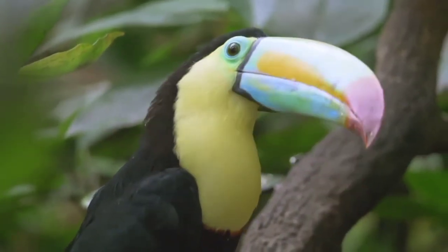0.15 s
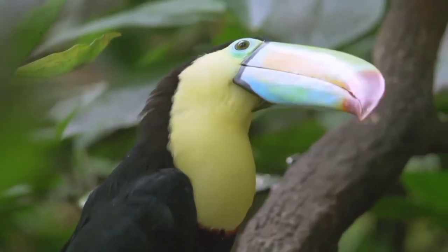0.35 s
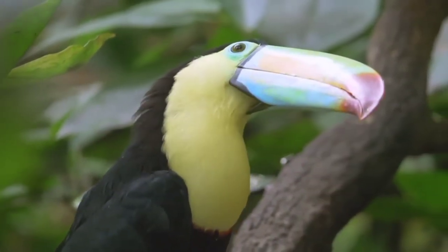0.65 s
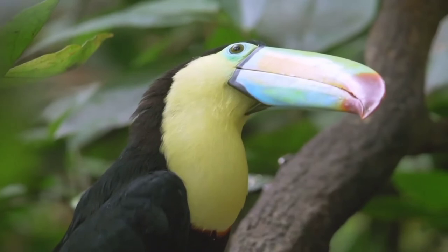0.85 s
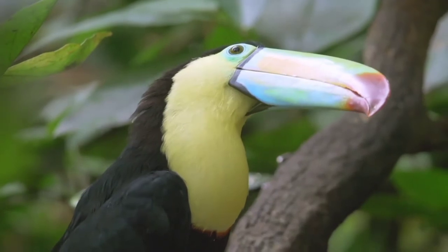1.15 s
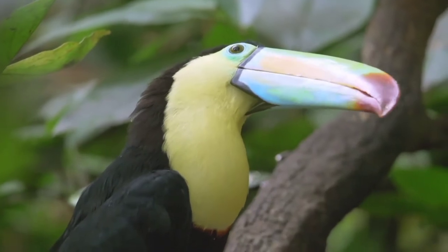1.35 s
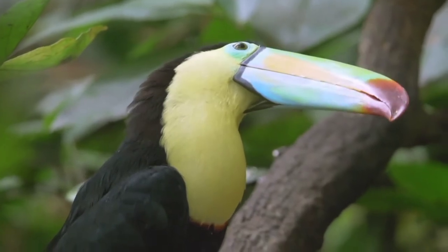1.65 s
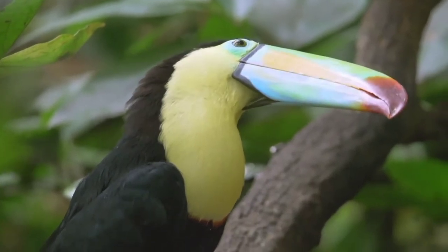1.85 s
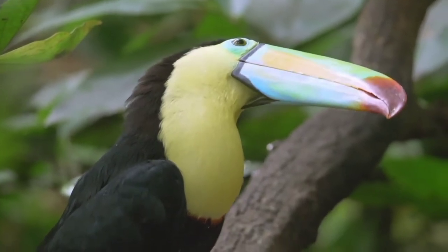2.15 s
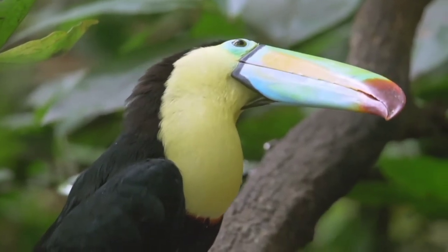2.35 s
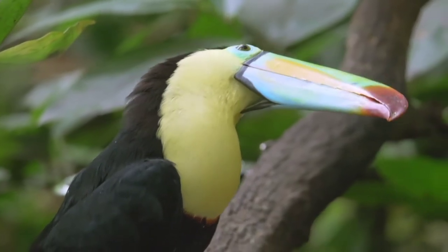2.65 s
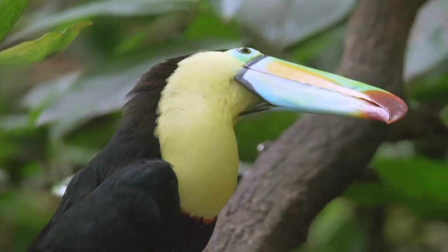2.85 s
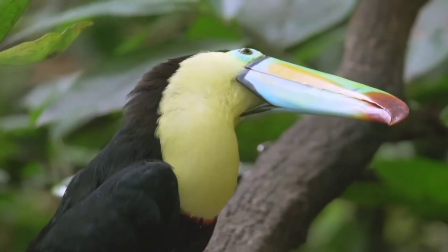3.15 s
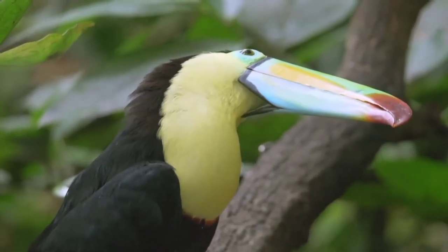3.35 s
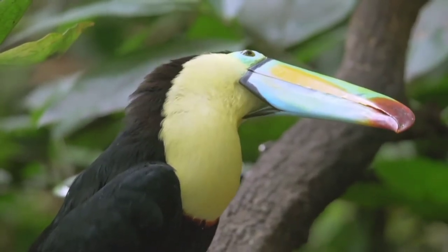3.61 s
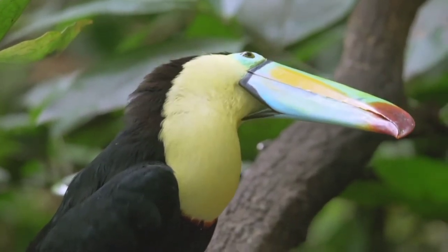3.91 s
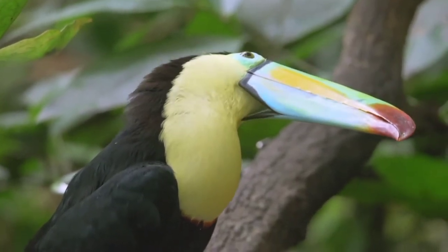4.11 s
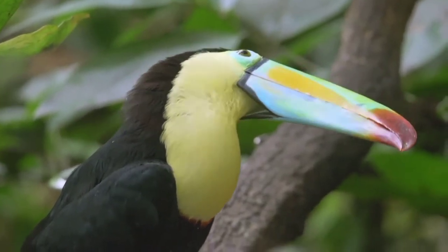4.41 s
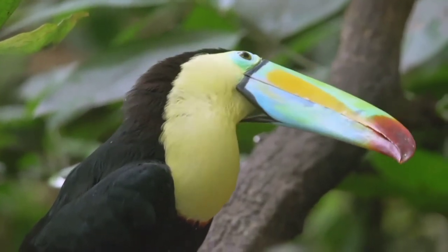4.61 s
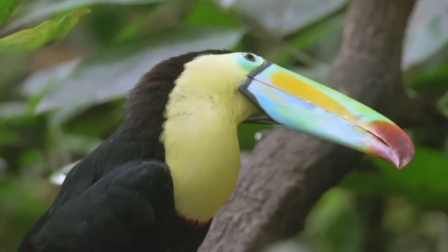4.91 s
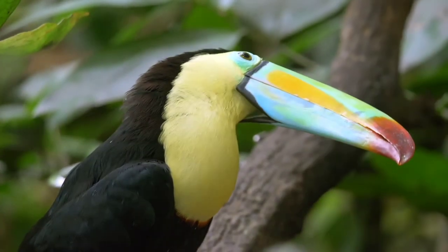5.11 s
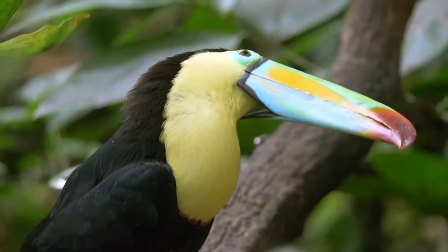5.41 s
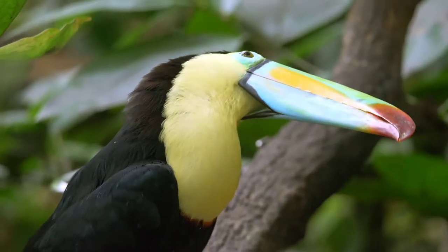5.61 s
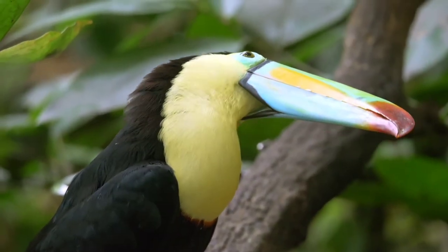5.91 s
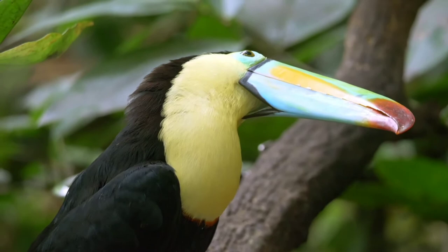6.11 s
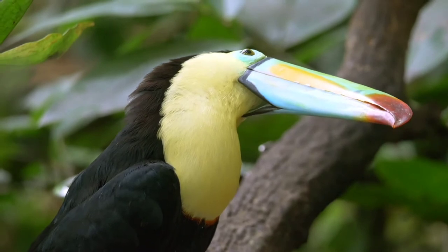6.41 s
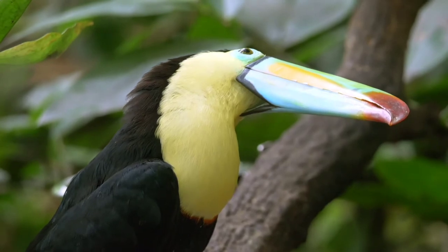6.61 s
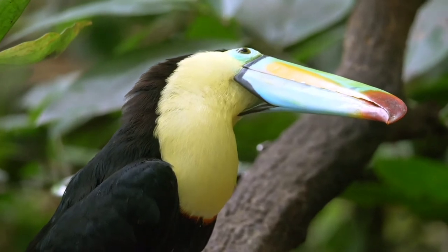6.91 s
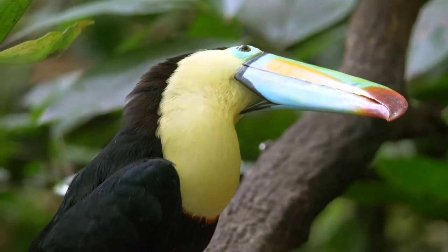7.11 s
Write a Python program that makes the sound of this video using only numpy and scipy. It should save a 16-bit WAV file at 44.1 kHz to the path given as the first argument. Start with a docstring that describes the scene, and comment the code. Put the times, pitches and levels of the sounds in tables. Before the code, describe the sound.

Brief hoarse toucan yelps, each drooping at the end, repeat close by over faint air and rumble, with distant whines and thin peeps behind.

```python
"""A toucan, close to the microphones in a reverberant aviary, yelps seven times, mostly in pairs.
Each yelp starts with a rasp, locks into a reedy tone, steps in pitch as the bird pushes, then droops.
Its harmonics share one gliding phase, roughened by noise; light bill clicks come before some yelps.
Further off another bird whines and a small one peeps, both as gliding tones with more of the room.
Low hollow swells of resonant noise come from the right, over faint air and a rumble."""
import sys
import numpy as np
from scipy import signal
from scipy.fft import rfft, irfft
from scipy.io import wavfile

SR = 44100
rng = np.random.default_rng(int(sys.argv[2]) if len(sys.argv) > 2 else 0)


def wrap_up_sound(samples):
    """Save the sound to the file named by the first command line argument, as 16-bit audio."""
    columns = np.atleast_2d(samples).T
    # keep every value between -1 and 1, then stretch to whole-number steps
    tamed = np.clip(columns, -1, 1)
    steps = np.round(tamed * 32767).astype(np.int16)
    wavfile.write(sys.argv[1], SR, steps)


N = 320166
TIME = np.arange(N) / SR


def undb(db):
    """Decibels to gain."""
    return 10 ** (np.asarray(db) / 20)


def unit(x):
    """Scale to rms 1."""
    return x / np.sqrt(np.mean(x ** 2))


def pan(x, left_db):
    """Place a sound between the two microphones by its left minus right level."""
    return x * undb(np.array([[left_db], [-left_db]]) / 2)


def noise(points):
    """Noise of rms 1 with a spectrum of (f/Hz, level/dB) points, joined along log frequency."""
    hz, db = np.transpose(points)
    bins = np.fft.rfftfreq(N, 1 / SR) + 1  # 1 Hz up, to keep the logarithm finite
    colour = undb(np.interp(np.log(bins), np.log(hz), db))
    return unit(irfft(rfft(rng.standard_normal(N)) * colour, N))


def band(centre_hz, width_hz):
    """Noise of rms 1 in one steep-sided resonance."""
    bins = np.fft.rfftfreq(N, 1 / SR)
    resonance = 1 / (1 + (2 * (bins - centre_hz) / width_hz) ** 4)
    return unit(irfft(rfft(rng.standard_normal(N)) * resonance, N))


def wander(rate_hz):
    """Smooth random movement of rms 1, mostly slower than rate_hz."""
    return band(0, 2 * rate_hz)


def gate(t, start, end, rise, fall):
    """Open from start to end, with smooth ramps outside."""
    ramp = np.clip(np.minimum((t - start) / rise, (end - t) / fall) + 1, 0, 1)
    return np.sin(ramp * np.pi / 2) ** 2


# colour of the steady air in the aviary: f/Hz, relative density/dB per Hz
AIR_COLOUR = [(30, 5.5), (80, -1), (130, -6), (165, -3), (210, -8), (330, -11.5), (460, -16), (750, -14.5),
              (1200, -21), (2200, -26.5), (4500, -32), (9000, -32.5), (11000, -47)]
# course of the low rumble before its own gain: t/s, level/dB
RUMBLE_COURSE = [(0.0, -81), (0.2, -82), (0.32, -59.5), (3.01, -60.5), (3.66, -62.5), (3.8, -75.5),
                 (4.63, -65.5), (7.26, -68)]


def background():
    """Broadband air and a slowly heaving low rumble, partly unrelated at the two microphones."""
    air = noise(AIR_COLOUR) + .7 * np.array([noise(AIR_COLOUR), noise(AIR_COLOUR)])
    low = 0.23 * band(30, 90) + np.array([band(25, 100), band(21, 120)])
    rumble = low * undb(np.interp(TIME, *np.transpose(RUMBLE_COURSE)) + 0.5)
    return pan(air * undb(-68.5), -2) + pan(rumble, -2.5)


# the nearer whine, already rising at the opening:
# end t/s, opening f/Hz, rise/Hz per s, level before the mix/dB, slope/dB per harmonic
OPENING_WHINE = (0.2757, 1901, 2397.5, -39, -3.5)
WHINE_CURL_HZ_PER_S2 = 2100  # it climbs ever faster
WHINE_DULL_DB_PER_S = 9.5  # extra fading, once for each step up the harmonics


def near_whine():
    """One hoarse, rising whine: five harmonics on an unsteady pitch, with a band of noise."""
    end, pitch_hz, rise_hz_per_s, db, slope_db = OPENING_WHINE
    t = np.minimum(TIME, end)
    glide_hz = pitch_hz + rise_hz_per_s * t + WHINE_CURL_HZ_PER_S2 * t ** 2
    hz = glide_hz * (1 + 0.0093 * wander(300) + .004 * wander(22))
    phase = 2 * np.pi * np.cumsum(hz) / SR
    tilt_db = slope_db - WHINE_DULL_DB_PER_S * t
    harmonics = sum(undb(k * tilt_db) * np.sin((k + 1) * phase) for k in range(5))
    hoarseness = undb(-23) * band(3100, 700)
    level = np.sqrt(2) * undb(db) * gate(TIME, 0, end, .01, .03)
    return pan(level * (harmonics + hoarseness), 11)


# toucan yelps; pitch steps down in the first of a pair and up in the second. Levels precede envelope and mix:
# start t/s, length t/s, push after t/s, pitch f/Hz, step f/Hz,
# harmonics 1, 2, 3 before the push level/dB, harmonics 1, 2, 3 after it level/dB,
# rasp lead t/s, rasp level/dB, period doubling level/dB, overtones level/dB, hoarseness level/dB
TOUCAN_YELPS = [(0.172, 0.14, 0.041, 1788, -101, -29, -26, -40.5, -16, -14, -21, .043, -35.5, -26, 1, -41.5),
                (0.738, 0.14, 0.062, 1622, 113.5, -29.5, -21, -21, -18, -12.5, -15, 0.017, -31.5, -38, 10, -41),
                (2.436, 0.18, 0.059, 1799, -105, -24, -16.5, -31.5, -18.5, -20.5, -35, 0.026, -28, -49.5, -8.5, -43.5),
                (3.043, 0.16, 0.077, 1596, 86.5, -30, -25, -39.5, -22, -18, -32, 0.0064, -42.5, -41, -5, -38.5),
                (5.032, 0.16, 0.034, 1791, -92.5, -28, -24, -46, -17.5, -18.5, -32.5, 0.043, -37.5, -57, -14, -43),
                (5.518, .14, 0.09, 1608, 121.5, -31, -26, -36.5, -21, -15.5, -30.5, 0.013, -40, -44.5, -5.5, -39),
                (7.182, 0.23, 0.069, 1800, -94, -32.5, -26.5, -35.5, 2, -5, -26, 0.039, -40.5, -52, -5.5, -32)]
# weak upper harmonics: multiple of the pitch, level against the whole tone before each yelp's setting/dB
UPPER_HARMONICS = [(4, -30), (5, -29.5), (6, -54)]
# colour of the air noise in throat and bill: f/Hz, relative level/dB
THROAT_COLOUR = [(400, -46.5), (700, -13), (1100, -3.5), (1600, -2), (2000, -8), (2350, -1.5), (3200, -2.5),
                 (3800, -6.5), (4700, -3.5), (5500, -16), (6200, -13), (7200, -19.5), (8100, -23),
                 (10500, -44)]
# harmonics thrown forward by the bill, alike in every yelp: multiple of the pitch, level before envelope/dB
BILL_BEAM = [(1, -32.5), (2, -26), (3, -25), (4, -45), (5, -49), (6, -62.5)]
SAG_HZ_PER_S, FADE_DB_PER_S = 640, 13  # steady fall of pitch; fall of level after the push
PUSH_S = .0083  # time scale of the push
DROOP_HZ, DROOP_S = 132, .017  # fall of pitch as the pressure gives out
RELEASE_DB, RELEASE_S = 10.5, 0.015  # fall of level with it
CLOSE_S = 0.01  # the syrinx shuts
RASP_RISE_S, RASP_GROWTH_DB_PER_S = .016, 110.76  # the rasp sets in softly and swells
CHEST_HZ, CHEST_WIDTH_HZ, CHEST_DB = 1050, 540, -49  # low, throaty noise under the tone


def toucan():
    """The syrinx rattles at a third of its pitch, then locks; gives tone, overtones and beamed sound."""
    out, overtones, beamed = np.zeros((3, N))
    air, jitter, rattle, shimmer = noise(THROAT_COLOUR), wander(180), wander(210), wander(500)
    flutter = [1 + 0.38 * wander(45) + .25 * wander(260) for _ in UPPER_HARMONICS]
    puffs, throaty = undb(3 * wander(40)), band(CHEST_HZ, CHEST_WIDTH_HZ)
    breaks = wander(70)  # the period doubling comes and goes
    for yelp in TOUCAN_YELPS:
        start, length, push_s, pitch_hz, step_hz, *levels_db = yelp[:11]
        lead, rasp_db, doubling_db, over_db, hoarse_db = yelp[11:]
        span = (TIME > start - .08) & (TIME < start + length + .04)
        t = TIME[span] - start
        held = np.clip(t, 0, length + CLOSE_S)

        # push, droop and fading
        pushed = 1 / (1 + np.exp((push_s - held) / PUSH_S))
        droop_hz = DROOP_HZ * np.exp((held - length) / DROOP_S)
        hz = pitch_hz - SAG_HZ_PER_S * held + step_hz * pushed - droop_hz
        release_db = RELEASE_DB * np.exp((held - length) / RELEASE_S)
        fade_db = FADE_DB_PER_S * np.maximum(held - push_s, 0) + release_db
        before_db, after_db = np.reshape(levels_db, (2, -1, 1))
        gains = undb(before_db + (after_db - before_db) * pushed)
        tone = gate(t, 0.00082, length, 0.0082, CLOSE_S) * undb(-fade_db)
        rasp = gate(t, 0.007 - lead, -.003, RASP_RISE_S, .008)
        rasp = rasp * undb(RASP_GROWTH_DB_PER_S * (t + lead / 2))

        # the rasp jitters more in pitch than the tone
        unsteady_hz = hz * (1 + jitter[span] * (0.003 + 0.008 * rasp))
        phase = 2 * np.pi * np.cumsum(unsteady_hz) / SR
        strength = tone * np.sqrt(np.sum(gains ** 2, axis=0))
        voice = tone * sum(g * np.cos(k * phase + k * k) for k, g in enumerate(gains, 1))
        beam = sum(undb(db) * np.cos(k * phase + k ** 2) for k, db in BILL_BEAM)
        beamed[span] += np.sqrt(2) * tone * beam

        # the upper harmonics flutter, and grow faster than the tone as the bird pushes
        push = strength / strength.max()
        upper = sum(undb(db + over_db) * f[span] * np.cos(k * phase)
                    for (k, db), f in zip(UPPER_HARMONICS, flutter))
        overtones[span] += strength * push ** 0.64 * upper

        # at full pressure alternate cycles differ: lines halfway between the harmonics
        halves = sum(np.cos((k + .5) * phase) * undb(db) for k, db in enumerate([-16, -4.5, 2.5, -3.5]))
        voice += strength * push ** 0.77 * undb(doubling_db) * halves * (1 + .5 * breaks[span])

        # the rasp repeats every third cycle: lines at thirds of the pitch
        thirds = 1 + .5 * np.cos(phase / 3 + 0.58 * rattle[span])
        buzz = .5 * np.cos(phase) + 0.49 * np.sin(2 * phase) + .2 * undb(over_db) * np.cos(3 * phase)
        voice += rasp * undb(rasp_db) * (thirds * buzz + 0.035 * air[span])

        # uneven cycles roughen the tone; air escapes in puffs
        breath = (undb(hoarse_db) * air + undb(CHEST_DB) * throaty) * puffs
        hiss = strength ** 0.7 * breath[span]
        out[span] += np.sqrt(2) * voice * (1 + 0.0058 * shimmer[span]) + hiss
    return out, overtones, beamed


def whistle(start, length, pitch_hz, glide_hz, bend, waver):
    """Samples, phase and envelope of a gliding note; a bend under 1 glides early, over 1 late."""
    span = slice(max(0, int((start - length / 10) * SR)), int((start + length * 6 / 5) * SR))
    t = TIME[span]
    hz = pitch_hz + glide_hz * np.clip((t - start) / length, 0, 1) ** bend
    phase = 2 * np.pi * np.cumsum(hz * (1 + waver[span])) / SR
    envelope = gate(t, start + length / 5, start + length * 9 / 10, length / 4, length / 5)
    return span, phase, np.sqrt(2) * envelope


# peeps of the small bird: start t/s, length t/s, starting f/Hz, level before the mix/dB
SMALL_BIRD_PEEPS = [(1.045, 0.046, 6440, -56), (1.459, .023, 6500, -55.5), (1.49, .038, 6520, -53),
                    (3.326, .047, 6590, -51), (4.169, 0.065, 6490, -59.5), (4.593, .11, 6620, -61)]
PEEP_RISE_HZ, PEEP_BEND = 515, 0.31  # bend: power of elapsed time


def small_bird():
    """Thin, high peeps: single wavering sines that slide upward, fastest at first."""
    out, waver = np.zeros(N), 0.014 * wander(160)
    for start, length, pitch_hz, db in SMALL_BIRD_PEEPS:
        span, phase, envelope = whistle(start, length, pitch_hz, PEEP_RISE_HZ, PEEP_BEND, waver)
        out[span] += undb(db) * envelope * np.sin(phase)
    return pan(out, 4.5)


# soft bill clicks before a yelp: t/s, level before the 6 dB cut and the mix/dB
SOFT_CLICKS = [(2.376, -45), (4.956, -61), (7.116, -45)]


def bill_clicks():
    """The light bill rings for a few milliseconds: short gates on two bands of noise."""
    ring = unit(band(2450, 900) + .4 * band(3500, 1500))
    gates = sum(undb(db) * gate(TIME, s, s + 0.004, 0.0031, 0.014) for s, db in SOFT_CLICKS)
    return gates * ring * undb(-6.0)


# whines of the farther bird:
# start t/s, length t/s, starting f/Hz, glide f/Hz, level before the mix/dB, second harmonic against the first/dB
DISTANT_WHINES = [(2.935, 0.12, 2156, -60, -77.5, 6), (4.428, .06, 1854, 8, -84, -26),
                  (5.391, 0.17, 2020, -75.5, -66.5, -19), (5.958, 0.13, 2128, 193.5, -60.5, -4),
                  (6.08, 0.15, 3250, -23, -66.5, -30.5), (6.166, .04, 2070, -250, -64.5, -23.5),
                  (6.181, .16, 2365, 71.5, -61.5, -52), (6.33, 0.33, 2516, 11.5, -70.5, -42),
                  (6.353, .17, 2143, 168.5, -59, -3.5), (6.502, 0.041, 2150, -300, -62, -16),
                  (6.697, 0.074, 1692, 134, -60.5, -7.5), (6.739, 0.14, 2106, 110, -58.5, -8),
                  (6.84, 0.058, 2994, 70, -67, -27), (6.876, 0.24, 2397, -150, -69.5, -16)]
WHINE_BEND = 0.97  # power of elapsed time: a nearly straight glide


def far_whines():
    """Faint gliding whines with two harmonics on a wavering pitch."""
    out, waver = np.zeros(N), 0.0078 * wander(250) + .009 * wander(30)
    for start, length, pitch_hz, glide_hz, db, second_db in DISTANT_WHINES:
        span, phase, envelope = whistle(start, length, pitch_hz, glide_hz, WHINE_BEND, waver)
        harmonics = np.sin(phase) + undb(second_db) * np.sin(2 * phase)
        out[span] += undb(db) * envelope * harmonics
    return pan(out, 9.5)


# hollow swells: peak t/s, rise t/s, fall t/s, resonance f/Hz, width f/Hz, level before a 6 dB cut/dB
HOLLOW_SWELLS = [(3.73, .17, .25, 600, 122, -65.5), (3.832, .19, 0.19, 368, 89.4, -55.5),
                 (6.58, 0.52, 0.64, 310.8, 157, -67), (7.07, 0.39, .3, 305, 178, -58)]


def swells():
    """Soft hollow swells, each of noise in one low resonance, off to the right."""
    out = np.zeros(N)
    for peak, rise, fall, hz, width_hz, db in HOLLOW_SWELLS:
        out += undb(db) * band(hz, width_hz) * gate(TIME, peak, peak, rise, fall)
    return pan(out * undb(-6.0), -19.5)


def aviary(x, early_db, late_db, early_t60=0.19, late_t60=.8, treble_t60=.47):
    """Dense scatter from nearby leaves and branches, then a longer tail whose treble dies first."""
    t = TIME[:SR]
    # partly shared by the two microphones
    scatter, tail = rng.standard_normal((2, 2, SR)) + 1.2 * rng.standard_normal((2, 1, SR))
    early = scatter * undb(-60 * t / early_t60) * gate(t, 0.007, 1, .003, .1)
    edges_hz = [300, 2500, 4000, 6000, 11000]
    late = 0
    for lo, hi, t60 in zip(edges_hz, edges_hz[1:], np.linspace(late_t60, treble_t60, num=4)):
        bandpass = signal.butter(4, (lo, hi), "band", fs=SR, output="sos")
        late = late + signal.sosfilt(bandpass, tail) * undb(-60 * t / t60)
    late = late * gate(t, .025, 0.99, .02, .1)
    response = undb(early_db) * unit(early) + undb(late_db) * unit(late) / np.sqrt(2)
    return signal.fftconvolve(x, response / np.sqrt(SR), axes=1)[:, :N]


def scene():
    """The toucan is near and nearly dry, its bill beaming sound into the room; other birds are wetter."""
    air_and_rumble, whine = background(), near_whine()
    tone, overtones, beamed = toucan()
    peeps, clicks, whines = small_bird(), bill_clicks(), far_whines()
    near = tone + clicks
    # the drooping end of each yelp spills into the foliage more than the rest
    spill = sum(gate(TIME - start, length - .012, length, .015, 0.015)
                for start, length, *_ in TOUCAN_YELPS)
    direct = pan(near, -4.0) + overtones
    direct = direct + undb(-3) * whine + undb(2) * whines + undb(-3.5) * peeps
    close = pan((undb(-4.5) * near + beamed) * (1 + 1.1 * spill), -0.98) + undb(2.5) * overtones
    far = undb(-0.5) * whine + undb(9) * whines + undb(-2) * peeps
    close_room = aviary(close, early_db=-12.0, late_db=-26.0)
    far_room = aviary(far, early_db=-8.5, late_db=-5.5)
    return direct + close_room + far_room + swells() + air_and_rumble


TOP_HZ, CLOSING_FADE_S = 10800, .012


def record(dry):
    """A steep low-pass removes the top; a 12 ms fade closes the sound."""
    fade = np.clip((TIME[-1] - TIME) / CLOSING_FADE_S, 0, 1)
    lowpass = signal.ellip(10, .2, 70, TOP_HZ, fs=SR, output="sos")
    return signal.sosfilt(lowpass, dry * fade)


dry = scene()
out = record(dry)
wrap_up_sound(out)
```